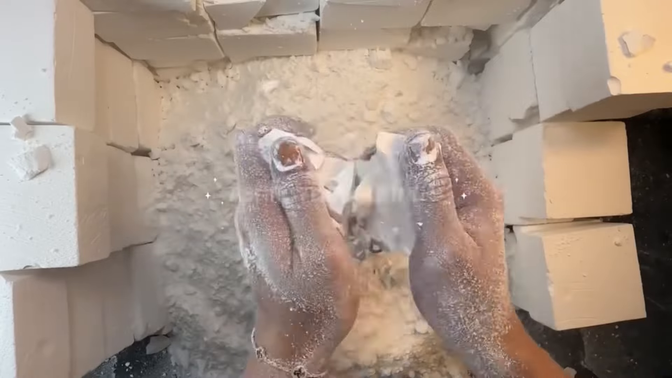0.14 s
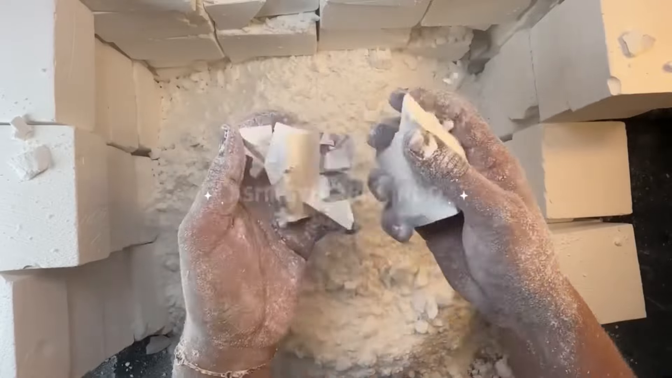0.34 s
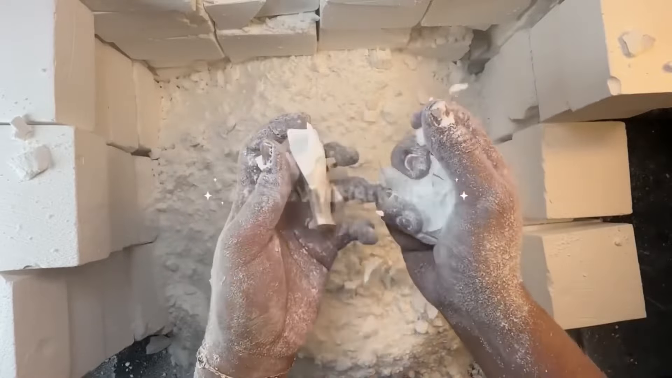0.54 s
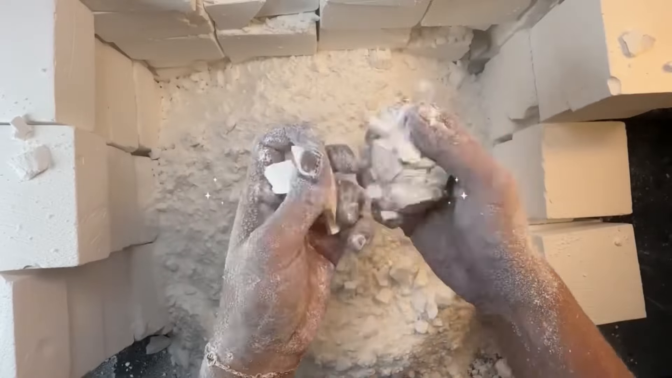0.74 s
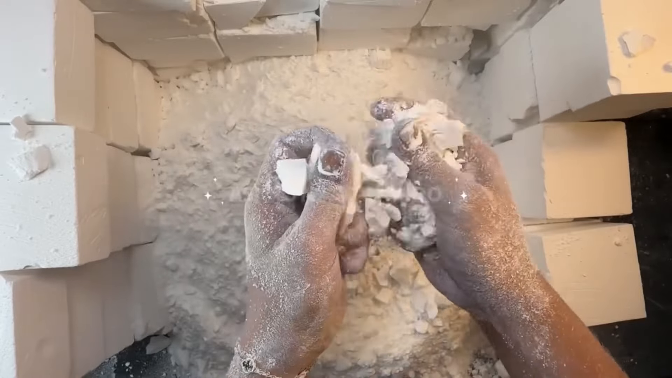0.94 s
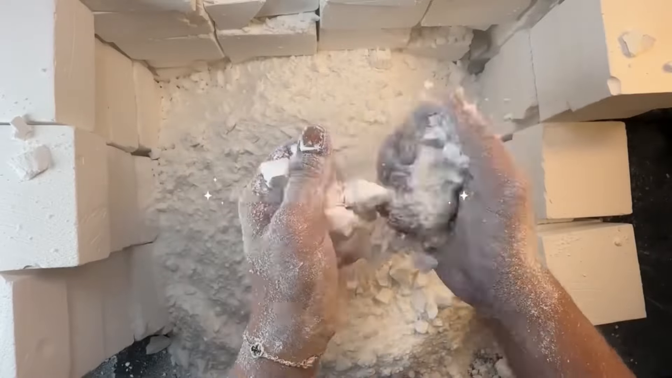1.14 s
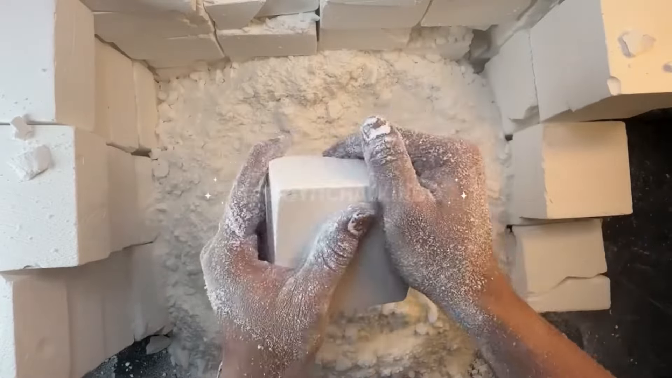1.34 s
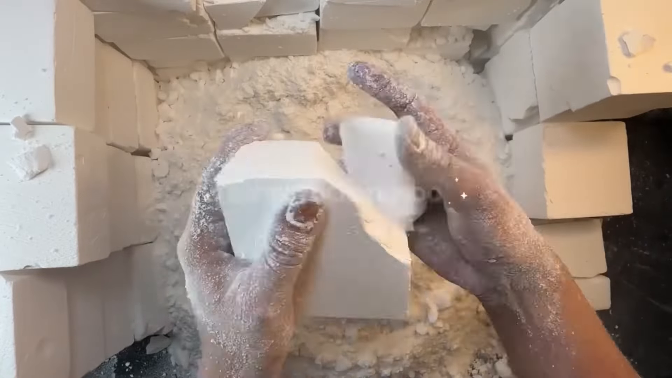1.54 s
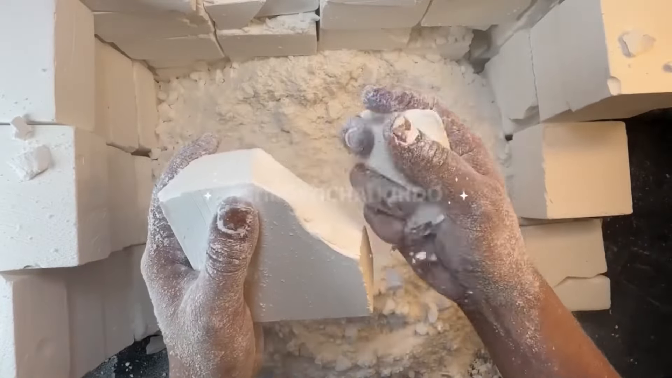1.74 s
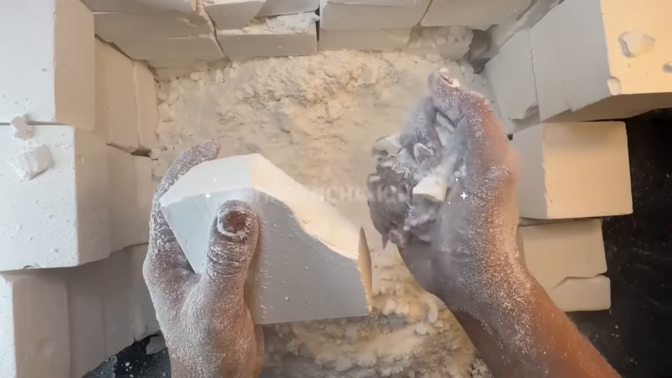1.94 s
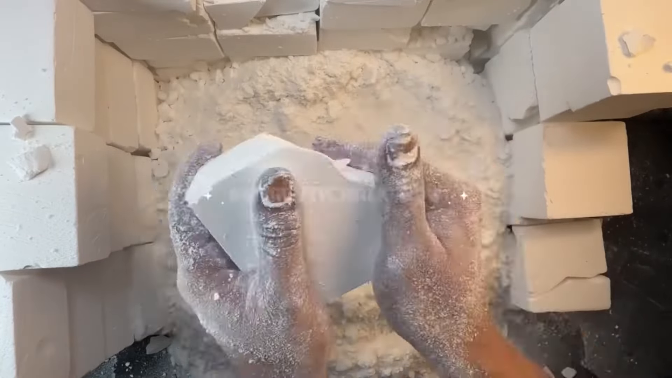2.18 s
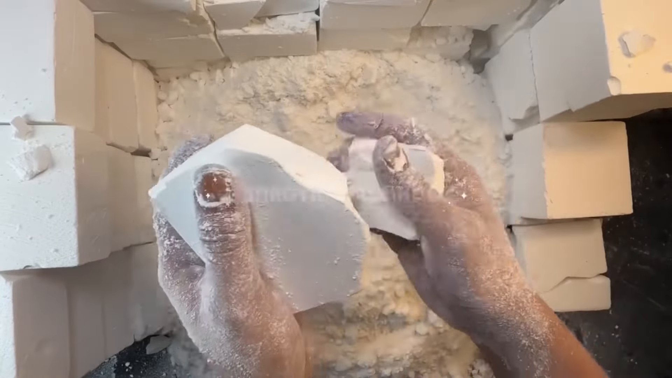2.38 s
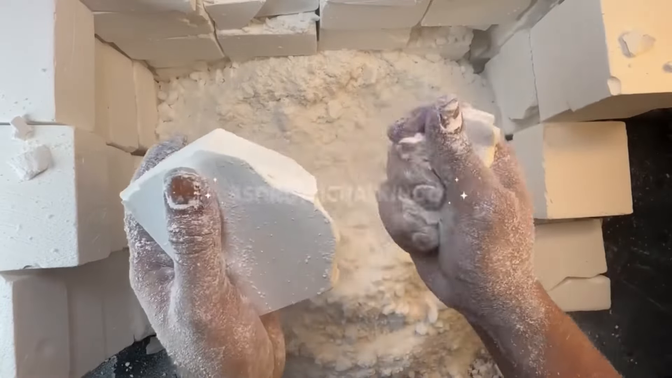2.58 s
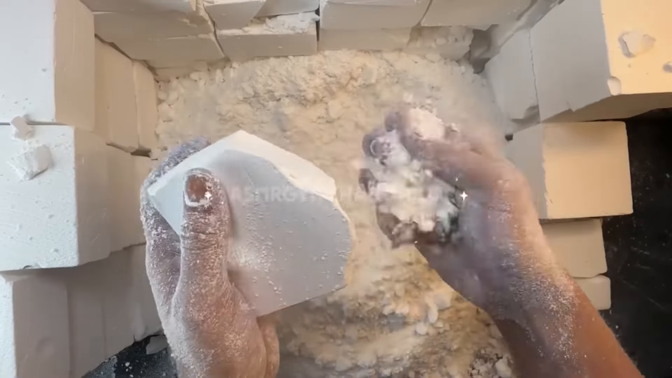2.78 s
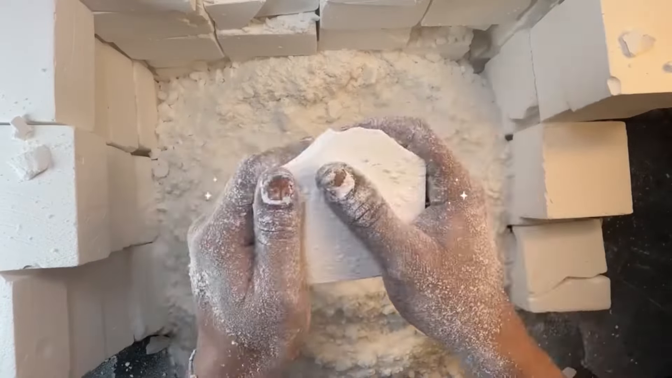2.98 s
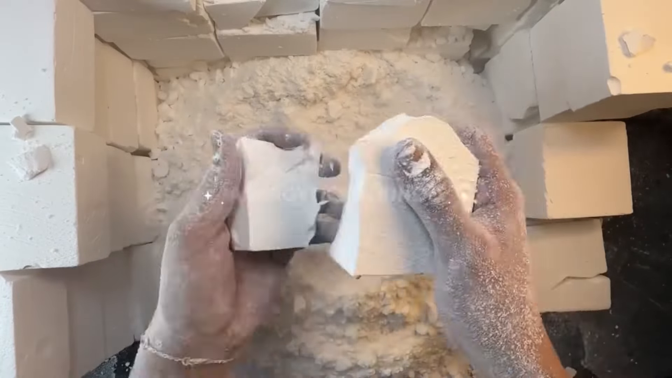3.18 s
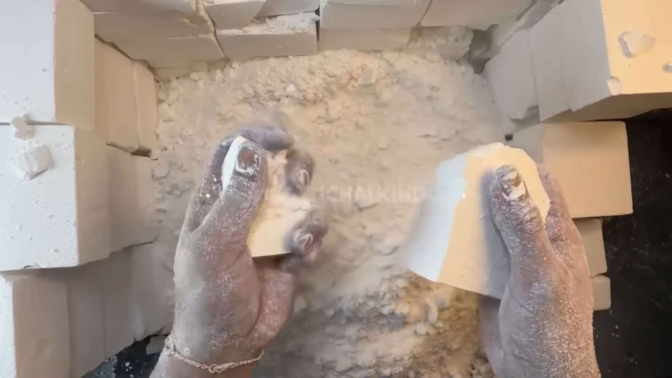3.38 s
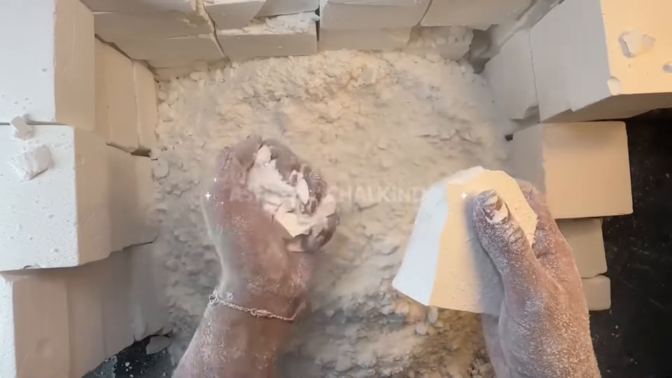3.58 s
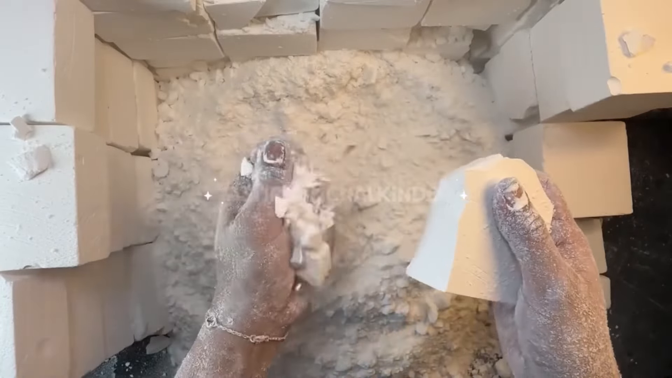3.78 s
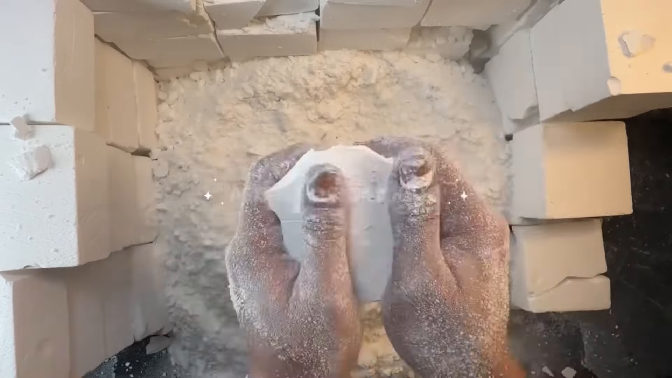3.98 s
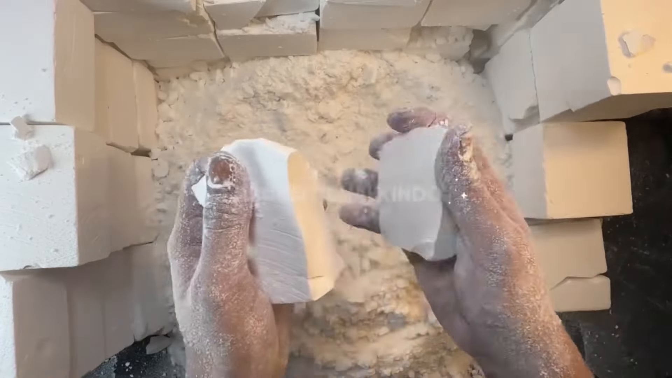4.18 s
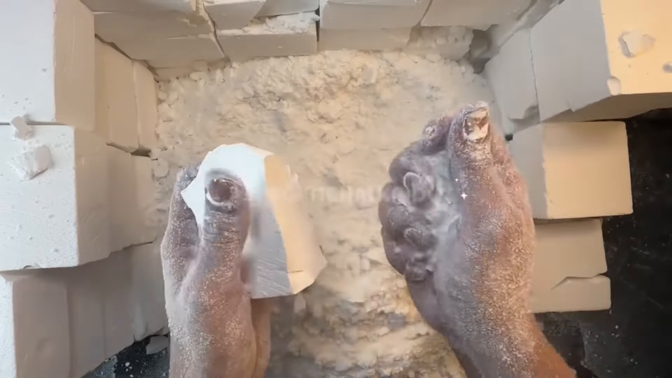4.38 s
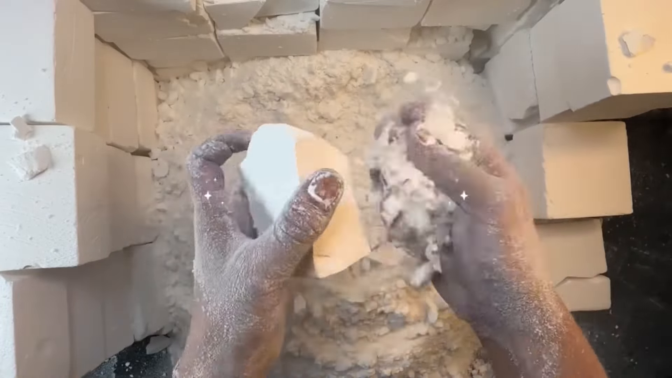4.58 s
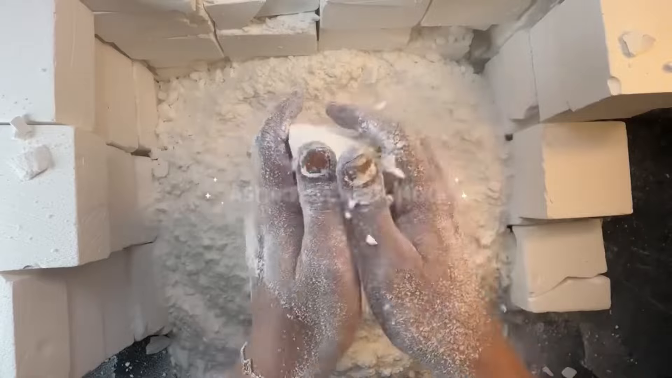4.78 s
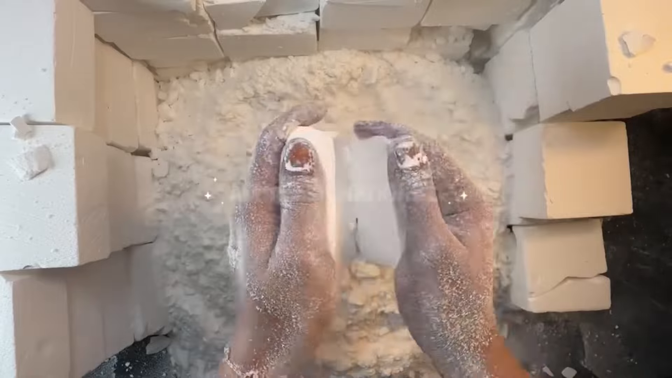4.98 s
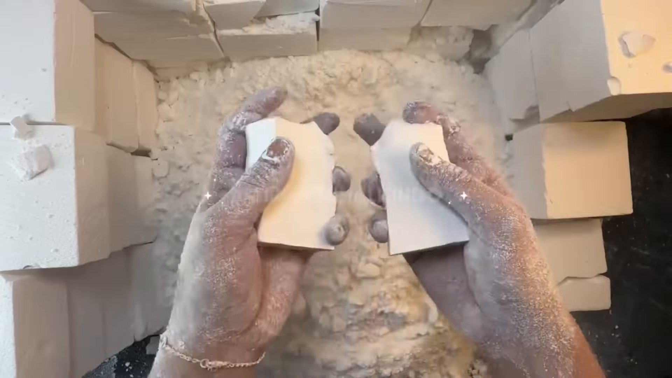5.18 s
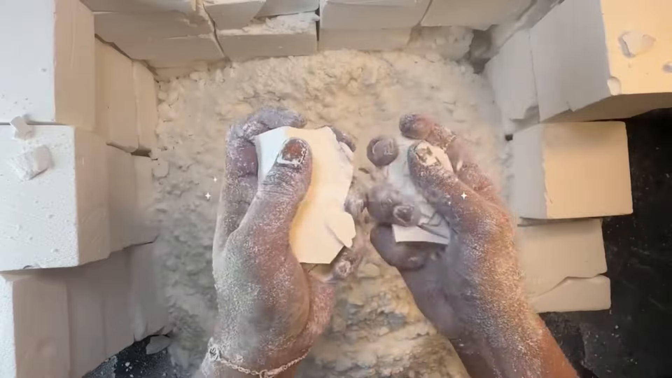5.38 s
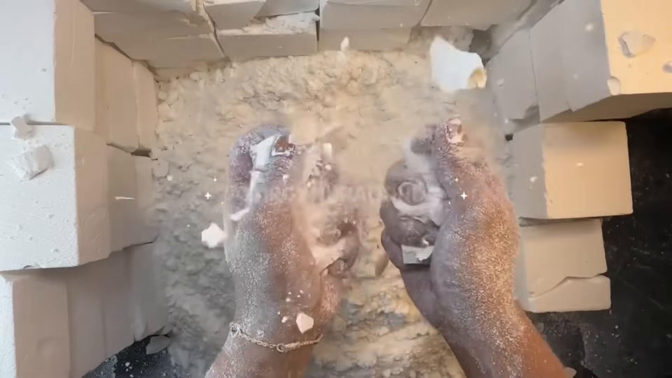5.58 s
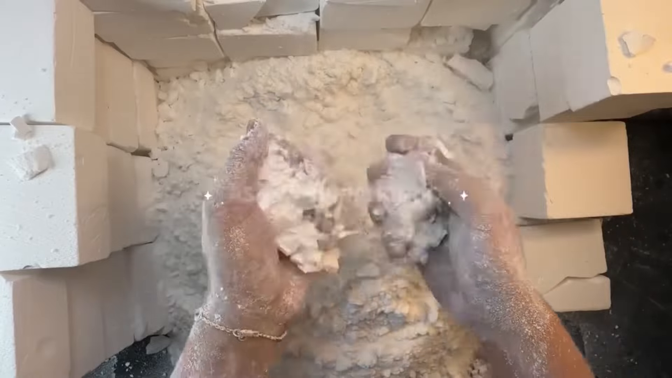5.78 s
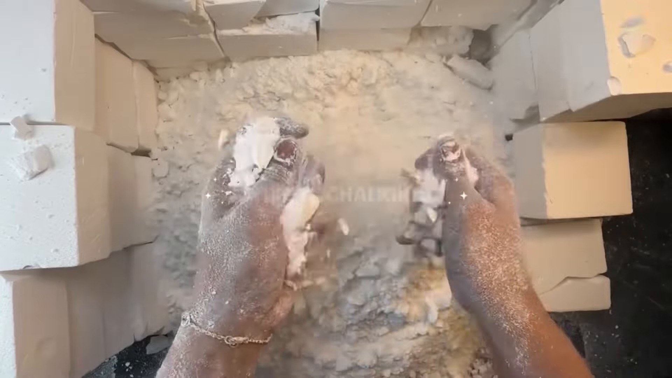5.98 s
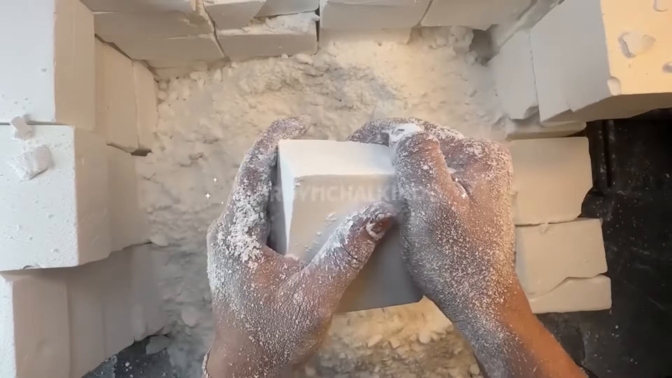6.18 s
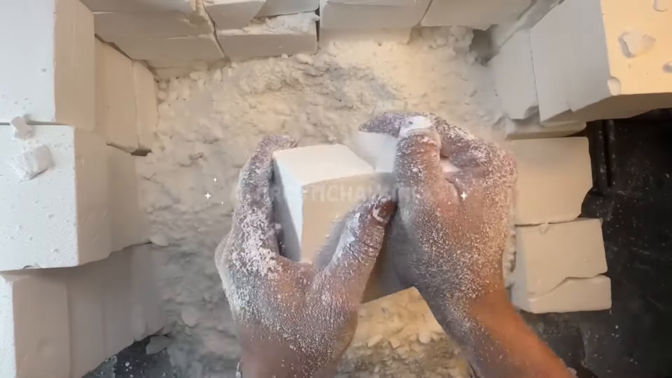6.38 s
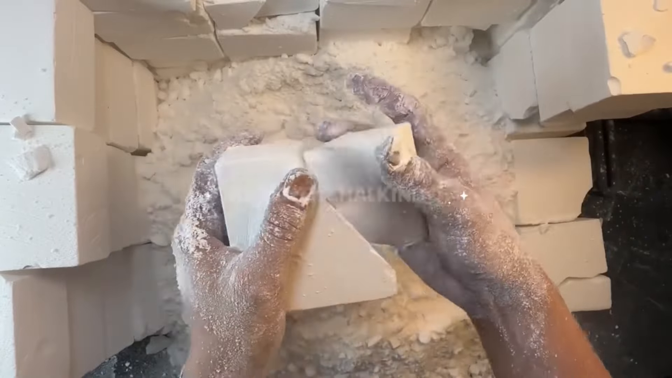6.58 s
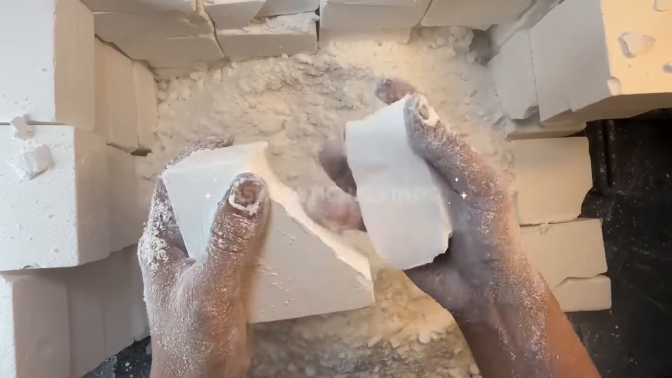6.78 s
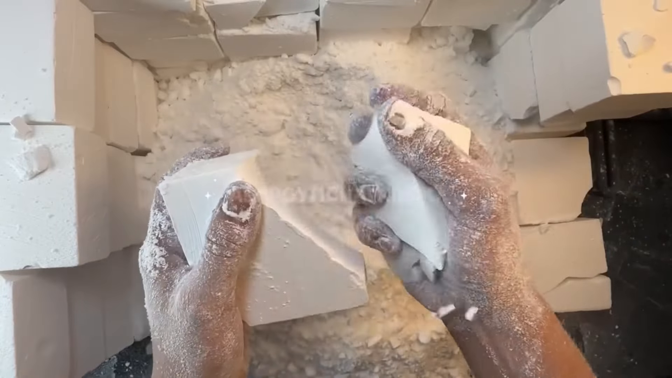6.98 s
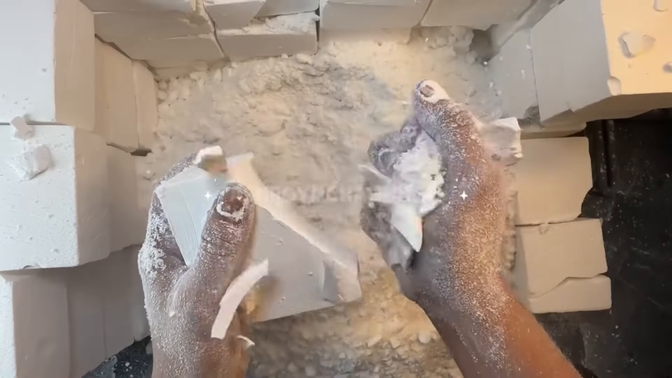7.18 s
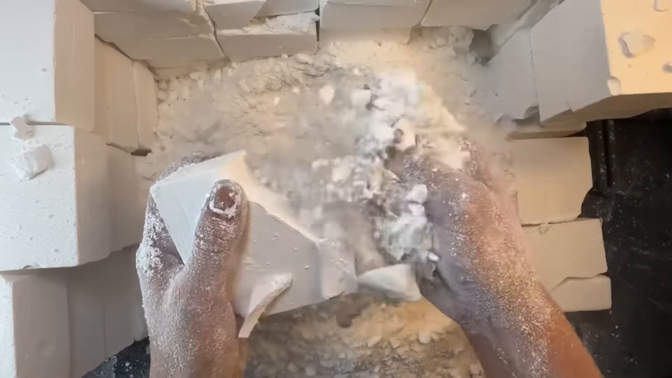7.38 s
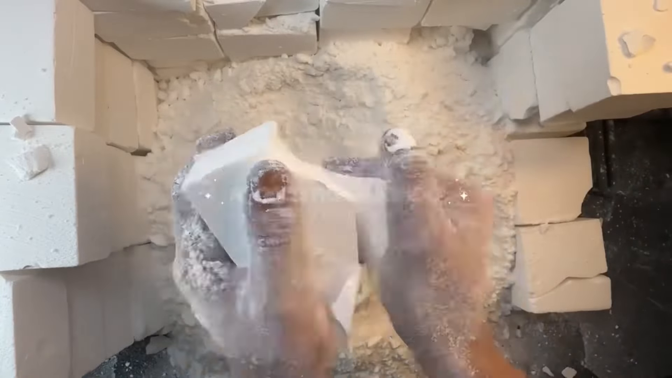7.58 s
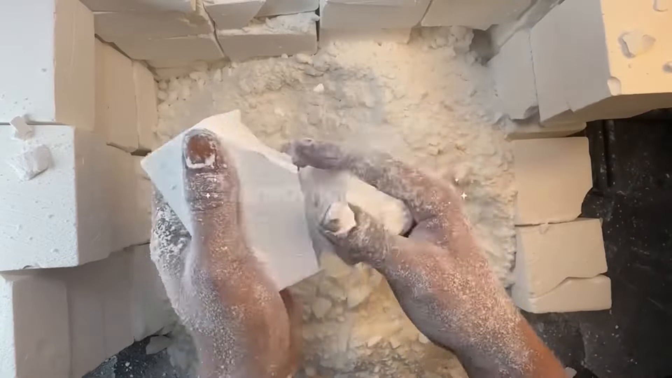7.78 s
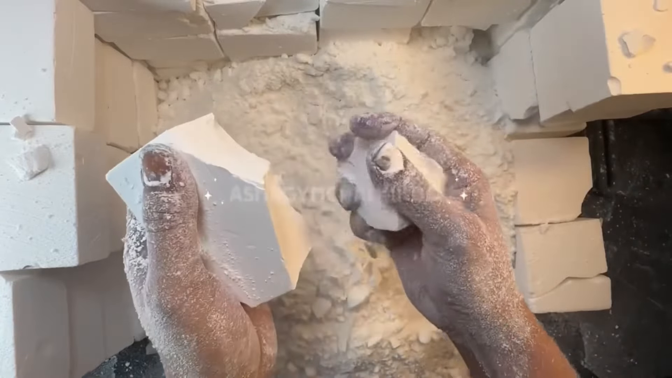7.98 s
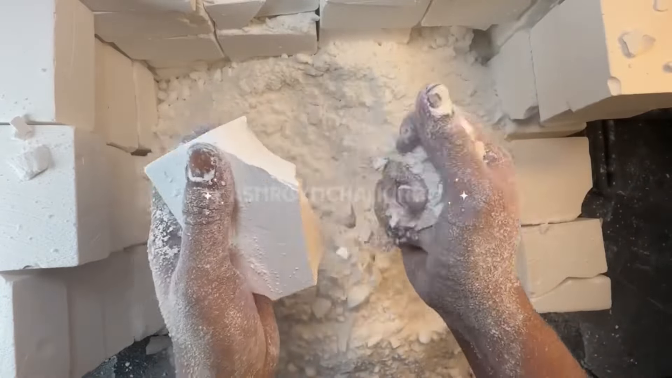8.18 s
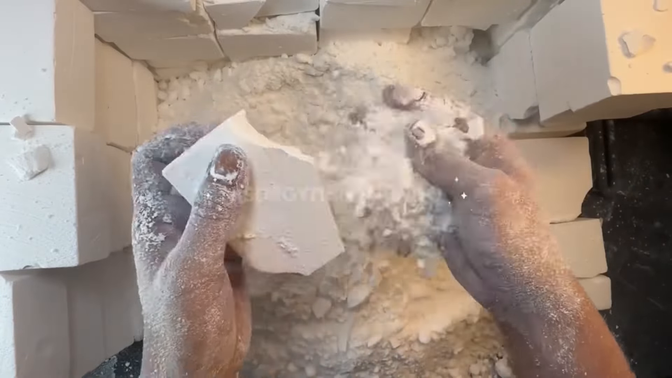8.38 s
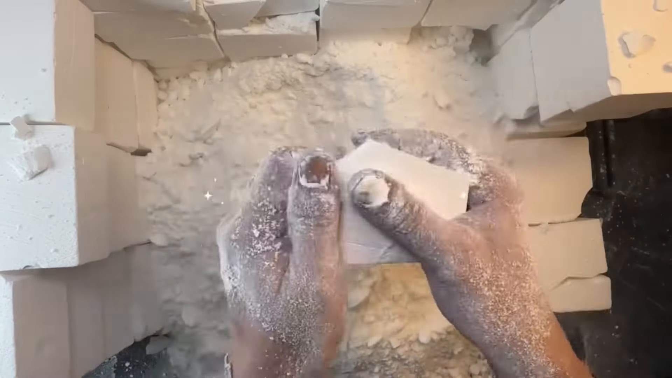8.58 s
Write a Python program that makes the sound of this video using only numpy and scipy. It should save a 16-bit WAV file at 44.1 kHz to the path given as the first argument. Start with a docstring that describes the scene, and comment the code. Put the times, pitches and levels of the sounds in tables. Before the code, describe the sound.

A fast run of chalk breaking: an early loud snap, crackling fistfuls, then repeated snap and crush, some cracks loud enough to flatten at the microphone. Around one and six seconds the chalk noise almost stops before a new block snaps. Between breaks, fine grit grinds and trickles, dry fingers swish, and dull knocks sound from a hollow surface. Intimate wide stereo with a short warm indoor tail.

```python
"""Blocks of dry chalk snap between two hands and the pieces crack in the fist, close to a two-port microphone.
Each break is a short avalanche of tiny random fractures, coloured by the damped resonance of the piece.
Between breaks, banded grains grind and trickle as crumbs, and soft noise swishes are dusty rubs.
Below lies a powdered, hollow work surface: damped modes knock and thud, filtered grains murmur in its colours.
Behind are a short near scatter, a warm room tail and faint hiss; the loudest snaps overload the microphone."""
import sys
import numpy as np
from scipy import signal
from scipy.fft import rfft, irfft
from scipy.io import wavfile
from scipy.ndimage import uniform_filter1d

SR = 44100
rng = np.random.default_rng(int(sys.argv[2]) if len(sys.argv) > 2 else 0)


def persist_wave(psi):
    """Save psi, clipped to +-1, as 16-bit WAV."""
    counts = np.round(np.clip(psi, -1, 1) * 32767).astype(np.int16)
    wavfile.write(sys.argv[1], SR, np.atleast_2d(counts).T)


N = 381024
SPAN, LEAD = 4096, 256   # samples in one break or filter response; samples of onset before a split
CUTOFF_HZ = 15700   # top of the crumb bands

# All levels in the tables are relative, before the gains of their layer.
# a whole block snaps between both hands:
# [t/s, level/dB, brightness/dB, f of the piece/Hz, nominal length/ms, knock on the surface/dB]
BLOCK_SNAPS = [(0.1147, -2.5, 2.5, 3020, 1.3, -2.5), (1.3895, -5, -3, 755, 2.7, 3.5),
               (2.2173, -10.5, 6, 7600, 1.7, -9.5), (3.0324, -9, 4.5, 1310, 2.05, -1.5),
               (4.0035, -14.5, -7.5, 955, 1.3, -1.5), (4.9149, -21.5, 0, 792, 2.2, -5),
               (6.3356, -18.5, 6, 810, 1.9, -1.5), (7.6007, -7.5, 0.5, 1090, 1.56, -4.5)]
# a piece gives way inside a fist: [t/s, level/dB, brightness/dB, f of the fragment/Hz, nominal length/ms]
FIST_CRACKS = [(0.375, -18.5, 3.5, 4600, 1.6), (0.4084, -24.5, 1, 1350, 0.58),
               (0.463, -27.5, -5, 8300, 1.4), (0.4756, -20.5, 4, 786, 2.7), (0.5214, -25, -1, 2260, 2),
               (0.5648, -23.5, -5, 3160, 0.51), (0.6203, -30, 3, 1290, 1.9), (.8355, -26, 2, 4400, 0.86),
               (0.847, -14.5, 8.5, 4400, 5.1), (0.8752, -22, 8, 10900, 2.9), (0.9156, -16, -2, 2120, 0.5),
               (0.9263, -19, 0, 4200, 8.8), (0.9642, -27, -15, 1330, 0.57), (1.0523, -23, 0, 3020, 13),
               (1.1911, -29.5, 3, 3140, 12), (1.6874, -11.5, -2, 750, 0.87), (1.7462, -0.5, 2, 3240, 0.93),
               (1.808, -26, -1, 2190, 1.4), (1.822, -6, -3, 1230, 2.3), (1.8803, -21, 4, 12000, 1.2),
               (1.8979, -14, -1, 1560, 0.84), (1.9166, -25.5, 3, 7600, 1.7), (1.9618, -25, 6, 8700, 1.4),
               (2.081, -25, -0.5, 3580, 0.92), (2.4573, -24.5, 2, 7940, 2), (2.4701, -1.5, 9.5, 7940, 0.85),
               (2.4973, -8.5, 14, 1460, 0.73), (2.535, -18.5, 4, 5000, 11),
               (2.5601, -12.5, 0.5, 2500, 0.33), (2.6515, -32.5, 1, 1400, 2.2),
               (3.316, -12, 6.5, 1390, 1.1), (3.349, -17.5, 8, 8000, 1.8), (3.427, -17.5, -3, 3370, 3.4),
               (3.4774, -17, -9, 3120, 1.4), (3.665, -30.5, 3, 7800, 1.5), (3.7162, -28.5, 2, 2330, 2),
               (3.8193, -24.5, 2, 8140, 1.6), (4.3216, -10.5, 4, 1320, 13.6),
               (4.3585, -18.5, 5, 2430, 0.64), (4.4265, -28.5, -2, 11600, 2.5),
               (4.544, -29.5, 5, 4700, 1.6), (4.7044, -28, 3, 1600, 4.8), (4.7981, -31.5, -15, 1770, 1.1),
               (4.861, -34, -2, 1500, 5), (4.96, -28, 3, 9500, 1.3), (5.2739, -13.5, -11, 1620, 2.1),
               (5.3047, -16, -17, 1820, 0.42), (5.324, -20.5, 11, 12000, 5.9),
               (5.3492, -26.5, -2, 9500, .8), (5.3685, -23, 0, 5500, 2.6), (5.4233, -11, 4, 1130, 2.9),
               (5.44, -18.5, -1, 3200, 4.8), (5.4677, -11.5, -1, 3320, 2), (5.5364, -4.5, 4, 2130, 4.5),
               (5.9013, -25.5, 1, 1190, 8.5), (5.9229, -17.5, 8, 2820, 3.6), (5.9338, -33, 17, 3300, 1.3),
               (5.959, -30.5, 9, 11500, 1.7), (6.4536, -25, 8, 8200, 3.7), (6.984, -4, -3.5, 2270, 1.24),
               (7.0388, -17, -9, 2350, 1.8), (7.0536, -24, 1, 1600, 3.3), (7.074, -21.5, -4, 1700, 1.9),
               (7.0914, -19, -5, 2300, 0.35), (7.1158, -25, -15, 1290, 0.49), (7.1306, -15, 1.5, 2390, 1.1),
               (7.1671, -32, 5, 3000, 0.7), (7.1943, -25.5, -9, 2510, 1.8), (7.7782, -31, -6, 1130, 3.2),
               (7.9173, -27.5, 2.5, 1120, 2.8), (7.9765, -32, 4, 4550, 1.4), (8.0136, -6.5, 6, 1110, 3.2),
               (8.0363, -8.5, 7, 6100, 0.66), (8.061, -19.5, -1.5, 5630, 5.7),
               (8.1011, -20.5, -15, 3000, 10), (8.1338, -21, 6, 3800, 2.5), (8.1627, -23, -1, 1810, 0.4),
               (8.2092, -27, -2, 1300, 4.6), (8.4353, -17.5, 1.5, 4370, 0.49)]
# spectrum of a break ahead of its own resonance and tilt: [f/Hz, level per Hz/dB]
CRACK_COLOUR = [(200, -13.5), (500, -8), (800, -6), (1250, 2), (1900, -3.5), (2800, 0.5), (4000, -2.5),
                (6300, -7.5), (9500, -5.5), (13000, -8), (16000, -9)]

# a fist closes on the pieces:
# [t/s, length/s, coarse grit level/dB, fine powder level/dB, level of debris landing on the surface/dB]
FIST_SQUEEZES = [(0.0, 0.0057, -37, -35.5, -60), (0.331, 0.19, -32.5, -36, -38.5),
                 (0.464, 0.18, -30, -30, -47), (0.729, .11, -32, -34.5, -52),
                 (0.853, 0.33, -32.5, -32, -44), (1.812, 0.12, -28, -27.5, -48),
                 (2.027, 0.13, -37.5, -40, -48), (2.498, 0.17, -33, -33.5, -43.5),
                 (2.74, 0.17, -33.5, -36.5, -42), (3.156, 0.097, -47, -42.5, -40),
                 (3.251, 0.084, -29, -31, -44), (3.395, 0.095, -27, -26.5, -42.5),
                 (3.628, 0.32, -33.5, -38, -55), (4.33, 0.14, -34.5, -34.5, -62),
                 (4.482, 0.31, -34.5, -39, -51), (5.258, 0.055, -32, -28.5, -33),
                 (5.449, 0.29, -25, -27, -34), (5.813, 0.183, -33, -34, -45.5),
                 (7.014, .14, -22.5, -27.5, -38), (7.266, 0.25, -29.5, -35, -37.5),
                 (7.838, 0.019, -37, -40, -42), (8.067, 0.16, -26.5, -29, -50),
                 (8.315, 0.057, -32, -41.5, -41), (8.415, 0.081, -31, -33.5, -46.5)]
# crumbs of all sizes, from the coarsest to the finest: [f/Hz, level per Hz/dB]
CRUMB_COLOUR = [(850, -7), (1250, 0.5), (1900, -3), (2900, -1.5), (4200, -1), (6300, -3.5), (9500, -2.5),
                (13000, -8), (15500, -12)]
# the sound of chalk and reflections is cut to near silence twice, and returns just before a snap:
# [from t/s, to t/s]
SOUND_CUTS = [(1.222, 1.384), (6.024, 6.331)]
# dusty fingers and faces of chalk slide over one another:
# [t/s, length/s, f of the swish/Hz, width/octaves, level/dB]
DUSTY_RUBS = [(.219, 0.024, 8550, 0.2, -27.5), (.22, .18, 9000, 3.5, -36),
              (1.484, 0.034, 3800, 0.77, -29.5), (1.485, 0.053, 7400, 1.5, -27),
              (1.586, 0.036, 7600, 0.93, -30), (1.587, 0.12, 10000, 1.5, -38),
              (2.233, 0.15, 9000, 1.6, -44.5), (3.037, .06, 1190, 0.28, -37), (4.001, .06, 910, .45, -30),
              (4.178, 0.068, 8700, 3, -33), (5.116, 0.095, 10100, 0.82, -41),
              (6.016, 0.26, 930, 0.52, -46.5), (6.423, 0.06, 6900, 1.7, -24),
              (6.522, 0.055, 4330, 0.22, -34.5), (6.523, 0.11, 9100, 1.2, -30.5),
              (6.64, .2, 8200, 1.8, -40), (6.865, 0.097, 2700, 0.32, -43), (6.874, .08, 8100, 1.1, -50),
              (7.597, .08, 1090, 0.47, -31), (7.61, 0.039, 9000, .8, -45)]

# modes of the hollow work surface: [f/Hz, level/dB, t60/s]
SURFACE_MODES = [(87, -29.5, 0.16), (141.2, -17.5, 0.13), (218.6, -19, 0.087), (323, -15.5, 0.05),
                 (432.5, 1, 0.017), (477.5, 0, 0.057), (539, -24, 0.16), (714, -18, 0.084),
                 (880, -30, 0.0047), (1240, -13.5, 0.027)]
# lumps landing and hands bumping: [t/s, level/dB]
SOFT_THUDS = [(0.514, -22), (1.139, -24), (1.896, -21.5), (2.511, -20), (2.917, -32), (3.267, -27.5),
              (3.43, -26.5), (3.937, -20), (4.413, -33), (4.989, -24.5), (5.68, -21.5), (6.41, -18.5),
              (7.11, -33), (7.776, -19), (8.03, -21), (8.536, -29)]
# the surface's murmur while the chalk is handled: [t/s, low rumble level/dB, boxy ring level/dB]
SURFACE_MURMUR = [(0, -44.5, -40), (.8, -48.5, -43.5), (1.3, -47.5, -42.5), (1.48, -42.5, -40.5),
                  (2.05, -48.5, -43.5), (2.45, -50.5, -42.5), (3.22, -39.5, -44), (3.65, -46.5, -43),
                  (4.3, -45, -38), (4.5, -49.5, -44.5), (4.75, -44.5, -37.5), (5.08, -48.5, -47),
                  (5.9, -41.5, -36), (6.28, -52.5, -55), (6.55, -45, -41.5), (7.4, -49.5, -42.5),
                  (7.75, -47, -51.5), (8.1, -43, -31.5), (8.39, -48, -40.5), (8.64, -44, -55)]
# low rumble of the surface: [f/Hz, level per Hz/dB]
RUMBLE_COLOUR = [(25, -39.5), (48, -29), (70, -5.5), (88, 3), (112, -0.5), (142, 0.5), (175, -6), (250, -9),
                 (400, -25.5), (900, -60)]
# boxy ring of the surface: [f/Hz, level per Hz/dB]
BOX_COLOUR = [(200, -15.5), (330, -5), (420, -1.5), (480, 9), (555, -1.5), (630, -11.5), (730, 7),
              (820, -13), (1050, -6), (1500, -40)]

# still air of the room and microphone hiss: [f/Hz, level per Hz/dB]
FLOOR_COLOUR = [(300, -13.5), (1100, -0.5), (1450, -13), (3500, -6.5), (7000, -23.5), (15000, -27)]
# difference between the two microphone ports: [f/Hz, side against mid level/dB]
PORT_WIDTH = [(40, 4.5), (80, -15.5), (300, -5.5), (480, -9.5), (750, -0.5), (1300, -3), (2300, -18.5),
              (4400, -4), (8000, -7.5), (11000, -1.5), (15000, 4)]

# a crack jolts the surface through the hand: the larger (lower) and duller the fragment, the harder
KICK_DB, KICK_DB_PER_OCTAVE, KICK_PER_BRIGHTNESS = -7.5, 4.5, 0.29
FRAGMENT_HZ = 2560   # a fragment of middling size
# a squeeze builds, eases as the pieces crumble, and lets go
GRIP_S, SAG_DB_PER_S, RELEASE_DB_PER_S = 0.029, 10, 156
# crumbs shed by a break, relative to its own level; a snap sheds more powder than grit
SNAP_GRIT_DB, SNAP_POWDER_DB = -24.5, -22
SHED_GRIT_DB, SHED_POWDER_DB, SHED_DB_PER_S = -30, -31.5, 183.5
# a piece in the fist starts to crumble just before it gives way
STRAIN_S, STRAIN_DB_PER_S = 0.025, 454
# dusty hands are never quite silent, but go stiller just before a break that follows a gap this long
IDLE_GRIT_DB, IDLE_POWDER_DB = -51, -47.5
BRACE_S, BRACE_DB, FRESH_GAP_S = 0.072, -8.5, 0.17
DUST_HISS = .3   # smooth hiss against the grinding grains
FALL_S = 0.08   # from the hands down to the surface
FLOOR_DB = -55.5


def cracks(breaks, gain_db=4.0):
    """Every snap and crack in the hands; a level is the energy spread over ten milliseconds, before the gain."""
    out = np.zeros((2, N))
    for s, db, bright_db, hz, length_ms, _ in breaks:
        add(out, s - LEAD / SR, from_db(db + gain_db) * fracture(bright_db, hz, length_ms))
    return out


def fracture(bright_db, hz, length_ms, fragment_db=7.5, octaves=0.29, front=1.43, grain_db=5.5,
             per_s=12000, stretch=0.95, tail=0.57, rise=0.022, lag_s=0.000522,
             onset_db=-19, onset_s=0.0011, bounce=0.18, bounce_s=0.00083):
    """A faint, fast-rising noise onset, a split and an avalanche of smaller ones, coloured by the fragment."""
    t = (np.arange(SPAN) - LEAD) / SR
    before, after = np.minimum(t, 0), np.maximum(t, 0)
    fade_s = max(length_ms, .2) * stretch / 1000
    onset = from_db(onset_db) * np.exp(before / onset_s) * (t < 0)
    avalanche = np.exp(-(after / fade_s) ** tail) * (1 - np.exp(-after / (rise * fade_s)))
    burst = unit(grains(SPAN, per_s, grain_db) * (onset + avalanche))

    # the shorter the break, the more of it is one clean split
    split = front / max(length_ms, .4)
    burst[0, LEAD + 1] += split
    burst[1, LEAD:LEAD + 3] += split * np.array([-1, 0, 1]) * rng.choice([-1, 1]) / np.sqrt(2)

    # the palm throws the sound back a moment later
    delay = int(bounce_s * SR * rng.uniform(.5, 2))
    burst = burst + bounce * np.roll(burst, delay, axis=-1)

    tilt = np.clip(np.log2(freqs(SPAN) / 3500), -1.4, 1.4) / 2.4
    colour = at_hz(CRACK_COLOUR, freqs(SPAN))
    colour = colour + (bright_db + 3.0) * tilt + fragment_db * hump(hz, octaves)
    return two_ports(burst, colour, lag_s) * np.sqrt(SR / 100)


def crumbs(coarse_db, fine_db, level_db=0.0, per_s=5000, grain_db=4.0, clump_db=4.5, clump_per_s=150,
           chips_per_s=110, chip_db=6.5, chips=0.78, patch_db=2.5, patch_per_s=70, fine_hz=5000, count=18):
    """Powder grinds in clumps while larger chips tick; each size of crumb has its band and comes and goes."""
    clumps = from_db(clump_db * wobble(N, SR / clump_per_s))
    ticks = chips * unit(grains(N, chips_per_s, chip_db) * clumps)
    grinds = []
    for _ in range(2):
        grit = unit(grains(N, per_s, grain_db) * clumps)
        hiss = unit(rng.standard_normal((2, N)))
        grinds.append(unit(grit + DUST_HISS * hiss))

    edges, out = np.geomspace(750, CUTOFF_HZ, count + 1), 0
    for k, (low, high) in enumerate(zip(edges, edges[1:])):
        hz = np.sqrt(low * high)
        band = signal.butter(2, [low, high], "band", fs=SR, output="sos")
        # neighbouring bands take turns between the two grinds
        mid, side = signal.sosfilt(band, grinds[k % 2] + ticks)
        fineness = 1 / (1 + (fine_hz / hz) ** 4)
        db = coarse_db + fineness * (fine_db - coarse_db) + at_hz(CRUMB_COLOUR, hz)
        db = db + patch_db * wobble(N, SR / patch_per_s)
        width = from_db(at_hz(PORT_WIDTH, hz))
        ports = np.array([mid + width * side, mid - width * side]) / np.sqrt(1 + width ** 2)
        out = out + from_db(db) * ports
    return from_db(level_db) * 2 * np.sqrt(N) * out


def crumbling():
    """Coarse grit, fine powder and falling debris in dB: squeezes, what breaks shed, and idle dust."""
    power = np.zeros((3, N))
    for s, length, *levels_db in FIST_SQUEEZES:
        power += from_db(levels_db)[:, None] ** 2 * grip(s, length) ** 2

    t = np.arange(SR // 2) / SR
    settling = from_db(-SHED_DB_PER_S * t)
    since_break = t - STRAIN_S
    straining = from_db(np.minimum(STRAIN_DB_PER_S * since_break, -SHED_DB_PER_S * since_break))
    for s, db, *_ in BLOCK_SNAPS:
        shed = from_db([[db + SNAP_GRIT_DB], [db + SNAP_POWDER_DB]])
        add(power[:2], s, (shed * settling) ** 2)
    for s, db, *_ in FIST_CRACKS:
        shed = from_db([[db + SHED_GRIT_DB], [db + SHED_POWDER_DB]])
        add(power[:2], s - STRAIN_S, (shed * straining) ** 2)

    power[:2] += from_db(bracing() + [[IDLE_GRIT_DB], [IDLE_POWDER_DB]]) ** 2
    return 10 * np.log10(power + 1e-12)


def grip(s, length):
    """One squeeze as a gain: it builds up, sags while held and is released."""
    t = np.maximum(np.arange(N) / SR - s, 0)
    release_db = RELEASE_DB_PER_S * np.maximum(t - length, 0)
    return np.minimum(t / GRIP_S, 1) * from_db(-SAG_DB_PER_S * t - release_db)


def bracing():
    """A dip of the idle dust, in dB, while the hands brace for a fresh break."""
    times, t = np.sort([s for s, *_ in BLOCK_SNAPS + FIST_CRACKS]), np.arange(N) / SR
    fresh = times[np.diff(times, prepend=-1) > FRESH_GAP_S]
    return BRACE_DB * sum(np.clip(1 + (t - s) / BRACE_S, 0, 1) * (t < s) for s in fresh)


def cuts(cut_db=-22):
    """A gain that drops within a few milliseconds for the length of each cut."""
    t = np.arange(N) / SR
    inside = sum(1.0 * ((t > start) & (t < end)) for start, end in SOUND_CUTS)
    return from_db(cut_db * uniform_filter1d(inside, size=128))


def rubs(skirt_db=36):
    """Each dusty slide is band-shaped noise, a soft swish that swells and fades."""
    out = np.zeros((2, N))
    for s, length, hz, octaves, db in DUSTY_RUBS:
        size = int(length * SR)
        swish = two_ports(rng.standard_normal((2, size)), skirt_db * np.log10(hump(hz, octaves)))
        add(out, s, from_db(db) * np.sqrt(size) * swish * np.hanning(size))
    return out


def knocks(breaks, knock_db=7.0, delay_s=0.0011, swell_s=0.0036, thud_db=5.5, thud_contact_s=0.013,
           thud_swell_s=0.002, pat_db=-17, pat_s=0.025, pat_hz=700):
    """Breaks jolt the surface sharply; lumps land softly in the powder, with a dull pat."""
    out, t = np.zeros(N), np.arange(3 * SPAN) / SR
    for s, *_, db in breaks:
        jolt = surface_ring(0) * (1 - np.exp(-t / swell_s))
        add(out, s + delay_s, from_db(db + knock_db) * jolt)

    muffled = signal.butter(2, pat_hz, fs=SR, output="sos")
    for s, db in SOFT_THUDS:
        thud = surface_ring(thud_contact_s) * (1 - np.exp(-t / thud_swell_s))
        pat = unit(signal.sosfilt(muffled, rng.standard_normal(len(t))))
        pat = pat * np.sqrt(len(t)) * np.exp(-t / pat_s)
        add(out, s, from_db(db + thud_db) * (thud / np.abs(thud).max() + from_db(pat_db) * pat))
    # a low cut removes deep bass from the knocks and thuds
    return signal.sosfilt(signal.butter(4, 66, "high", fs=SR, output="sos"), out)


def surface_ring(contact_s, vary_db=1.8):
    """Damped modes after one push: the longer the contact, the less the high modes ring."""
    t = np.arange(3 * SPAN) / SR
    hz, db, t60 = np.transpose(SURFACE_MODES)[:, :, None]
    strength, shift = rng.standard_normal((2, len(SURFACE_MODES), 1))
    pitch = hz * (1 + .01 * shift)
    # every mode but the strongest varies in level
    level_db = db + vary_db * strength * (db < db.max())
    modes = from_db(level_db - 60 * t / t60) * np.sin(2 * np.pi * pitch * t)
    return (modes / (1 + (hz * contact_s) ** 2)).sum(axis=0)


def with_kick(rows):
    """Give each crack its knock on the surface, from its level, size and brightness."""
    kicked = []
    for s, db, bright_db, hz, length_ms in rows:
        size_db = KICK_DB_PER_OCTAVE * np.log2(hz / FRAGMENT_HZ)
        kick_db = db + KICK_DB - size_db - KICK_PER_BRIGHTNESS * bright_db
        kicked.append((s, db, bright_db, hz, length_ms, kick_db))
    return kicked


def patter(debris_db, rumble_db=2.5, box_db=-1.5, debris_low_db=-3, debris_ring_db=3, lumps_per_s=500,
           lump_db=1.0, bits_per_s=250, bit_db=2.0, debris_per_s=90, debris_size_db=1.5):
    """The surface murmurs under the handling; debris of each squeeze lands on it in small separate knocks."""
    low_db, ring_db = in_time(SURFACE_MURMUR)
    landing = np.zeros(N)
    add(landing, FALL_S, from_db(debris_db))
    low_gain = np.hypot(from_db(low_db), from_db(debris_low_db) * landing)
    rumble = shower(grains(N, lumps_per_s, lump_db), RUMBLE_COLOUR) * low_gain
    box = shower(grains(N, bits_per_s, bit_db), BOX_COLOUR) * from_db(ring_db)
    debris = shower(grains(N, debris_per_s, debris_size_db), BOX_COLOUR)
    debris = debris * from_db(debris_ring_db) * landing
    return from_db(rumble_db) * rumble + from_db(box_db) * (box + debris)


def room(x, near_db=-15, near_t60_s=0.1, far_db=-16, far_t60_s=0.43, far_hz=1100):
    """Nearby blocks scatter a short bright tail; the room adds a longer, warm one."""
    t = np.arange(SR // 2) / SR
    near, far = rng.standard_normal((2, 2, len(t))) * (1 - np.exp(-t / 0.0008))
    warm = signal.butter(2, [far_hz / 2, far_hz * np.sqrt(2)], "band", fs=SR, output="sos")
    near = from_db(near_db) * unit(near * from_db(-60 * t / near_t60_s))
    far = from_db(far_db) * signal.sosfilt(warm, unit(far * from_db(-60 * t / far_t60_s)))
    return through(x, near + far)


def floor():
    """Still air and microphone hiss: faint steady coloured noise under everything."""
    return from_db(FLOOR_DB) * shower(rng.standard_normal((2, N)), FLOOR_COLOUR)


def grains(size, per_s, spread_db):
    """Random clicks, many small and a few large, with random signs in mid and side."""
    sizes = from_db(spread_db * np.minimum(rng.exponential(1, size), 4.5))
    return sizes * (rng.random(size) < per_s / SR) * rng.choice([-1, 1], (2, size))


def shower(stream, colour):
    """A stream of grains or noise heard in one colour; rms one."""
    return two_ports(stream, at_hz(colour, freqs(SPAN))) * np.sqrt(N)


def two_ports(pair, colour_db, lag_s=0.0):
    """Colour a mid and a side signal and turn them into left and right; unit energy."""
    width_db = at_hz(PORT_WIDTH, freqs(SPAN))
    mid_db = colour_db - 10 * np.log10(1 + from_db(width_db) ** 2)
    mid = through(pair[0], causal(mid_db, lag_s))[0]
    side = through(pair[1], causal(mid_db + width_db, lag_s))[0]
    return unit(np.array([mid + side, mid - side]))


def causal(db, lag_s=0.0, lag_hz=2200):
    """Minimum-phase impulse response of a dB curve; the lows may arrive up to lag_s after the highs."""
    cepstrum = irfft(np.log(from_db(db)))
    cepstrum[1:SPAN // 2] *= 2
    cepstrum[SPAN // 2 + 1:] = 0
    phase = 2 * np.pi * lag_s * lag_hz * np.arctan(freqs(SPAN) / lag_hz)
    return irfft(np.exp(rfft(cepstrum) - 1j * phase))


def through(x, response):
    """Convolve, keeping the length."""
    return signal.fftconvolve(np.atleast_2d(x), np.atleast_2d(response), axes=-1)[:, :x.shape[-1]]


def hump(hz, octaves):
    """A broad resonance: one at its centre, falling off over the given width."""
    return 1 / (1 + (np.log2(freqs(SPAN) / hz) / octaves) ** 2)


def wobble(size, step):
    """Random level of spread about one, joined by lines between values every step (at least 8) samples."""
    knots = rng.standard_normal(size // 8 + 2)
    return np.interp(np.arange(size) / max(step, 8), np.arange(len(knots)), knots)


def at_hz(points, hz):
    """Read a colour on a log-frequency axis."""
    f, db = np.transpose(points)
    return np.interp(np.log(hz), np.log(f), db)


def freqs(size):
    """Frequencies in Hz of a spectrum of this many samples, never below 1."""
    return np.maximum(np.arange(size // 2 + 1) * SR / size, 1)


def in_time(rows):
    """One curve per column, a value for each sample."""
    s, *columns = np.transpose(rows)
    return [np.interp(np.arange(N) / SR, s, c) for c in columns]


def add(out, s, sound):
    """Mix a sound in at time s."""
    i = max(int(round(s * SR)), 0)
    out[..., i:i + sound.shape[-1]] += sound[..., :N - i]


def unit(x):
    """Scale to an energy of one per channel, averaged over the channels."""
    return x / np.sqrt(np.mean(np.sum(x ** 2, axis=-1)) + 1e-20)


def from_db(db):
    """Decibels to gain."""
    return 10 ** (np.asarray(db) / 20)


def scene():
    """Chalk and surface, close to the microphone, in the room."""
    grit_db, powder_db, debris_db = crumbling()
    breaks = BLOCK_SNAPS + with_kick(FIST_CRACKS)
    chalk = cracks(breaks) + crumbs(grit_db, powder_db)
    surface = knocks(breaks) + patter(debris_db)
    reflections = room(chalk + from_db(-5.5) * surface)
    return (chalk + reflections) * cuts() + rubs() + surface + floor()


def record(dry, top=0.94):
    """The microphone flattens the loudest peaks just below full scale; the top of the treble is cut."""
    clipped = dry / (1 + (dry / top) ** 8) ** (1 / 8)
    treble_cut = signal.cheby2(16, 70, CUTOFF_HZ + 900, fs=SR, output="sos")
    return signal.sosfilt(treble_cut, clipped)


dry = scene()
out = record(dry)
persist_wave(out)
```